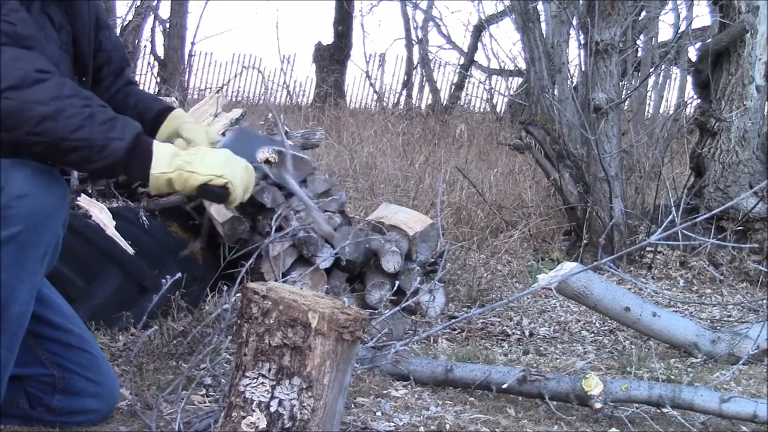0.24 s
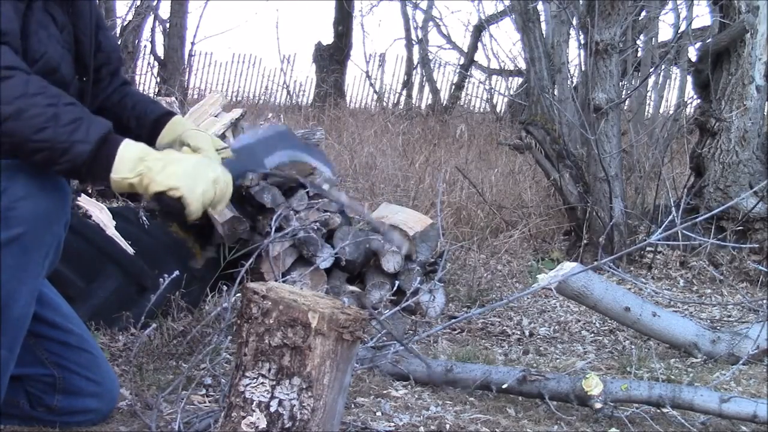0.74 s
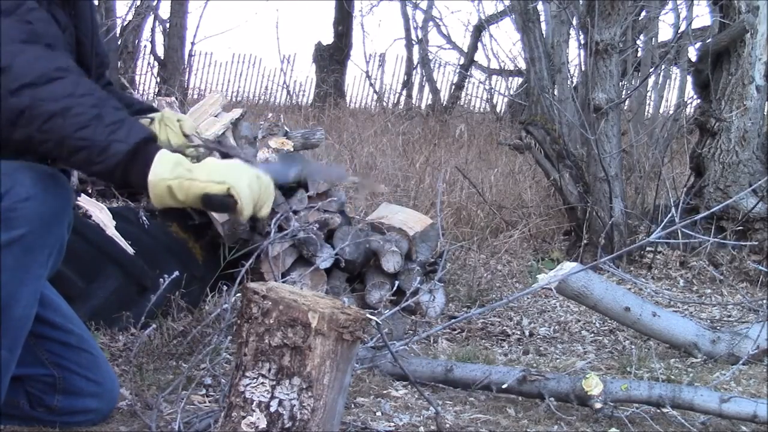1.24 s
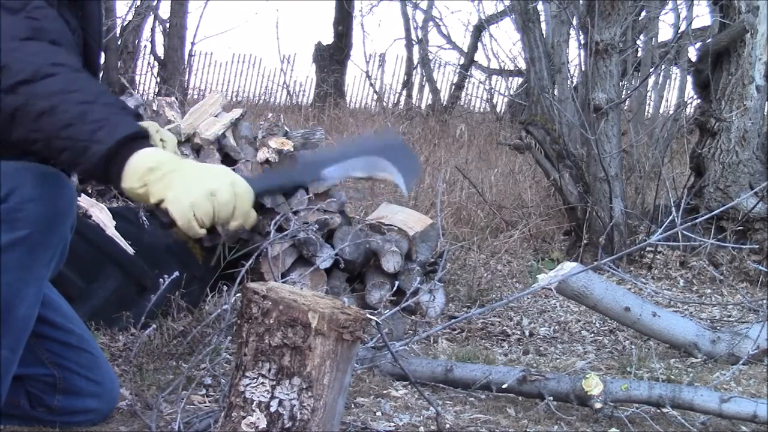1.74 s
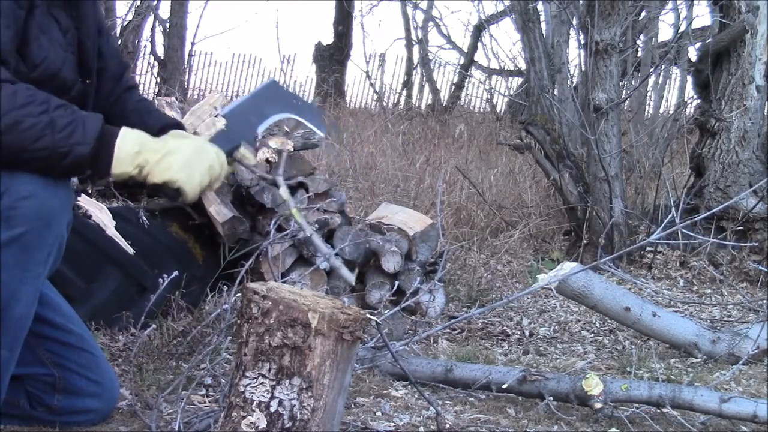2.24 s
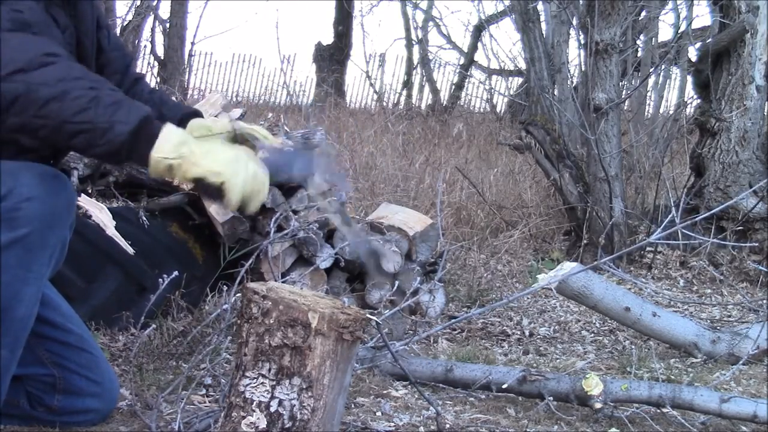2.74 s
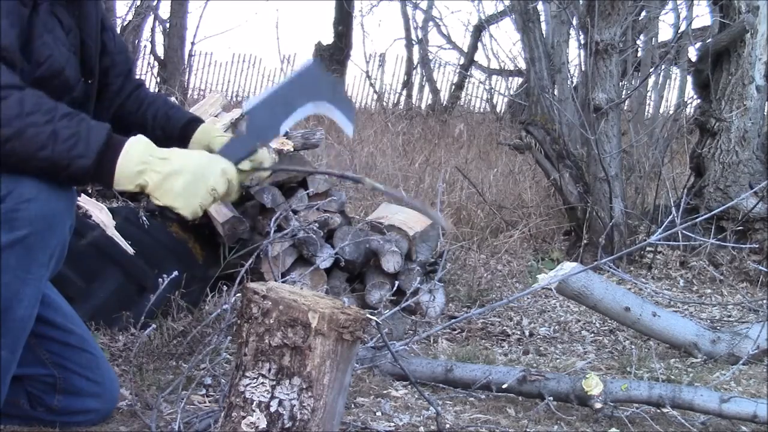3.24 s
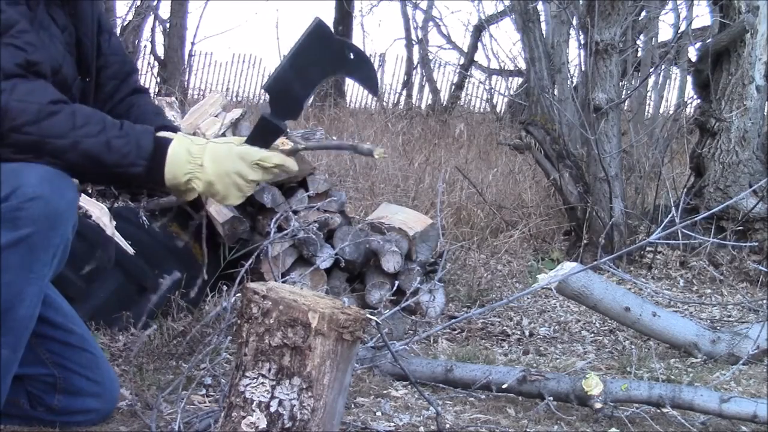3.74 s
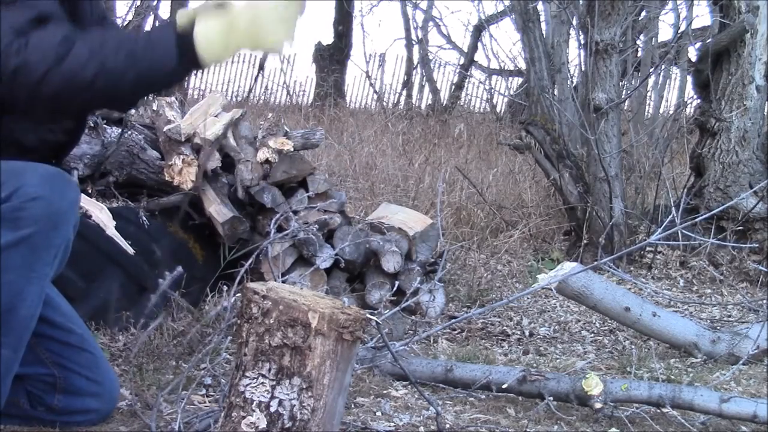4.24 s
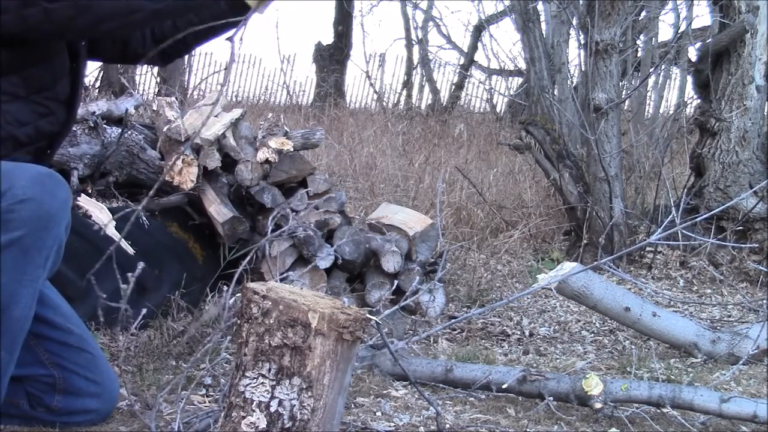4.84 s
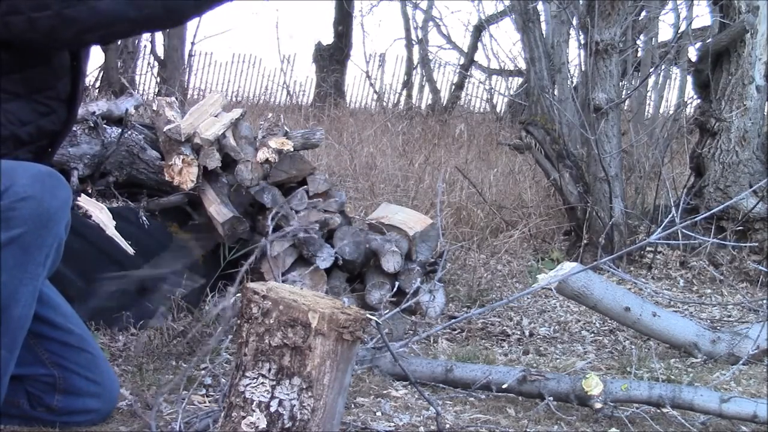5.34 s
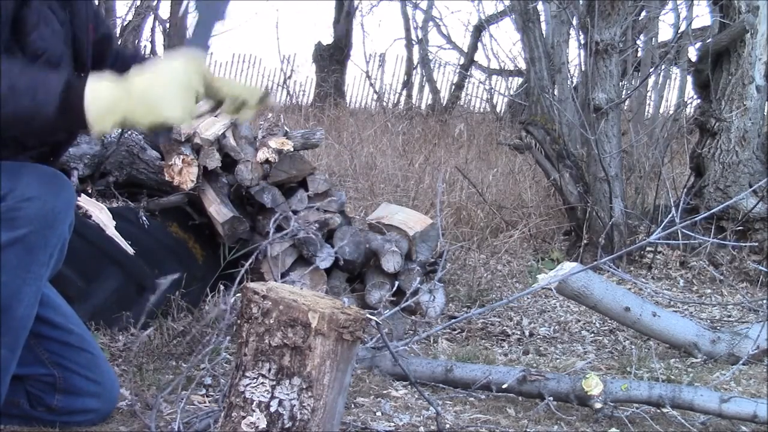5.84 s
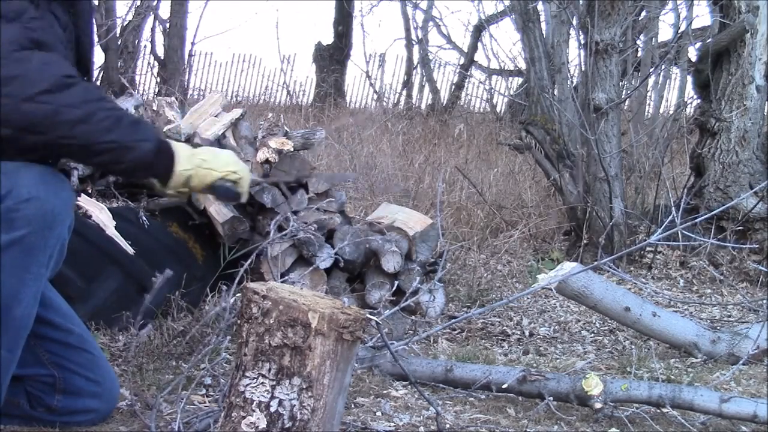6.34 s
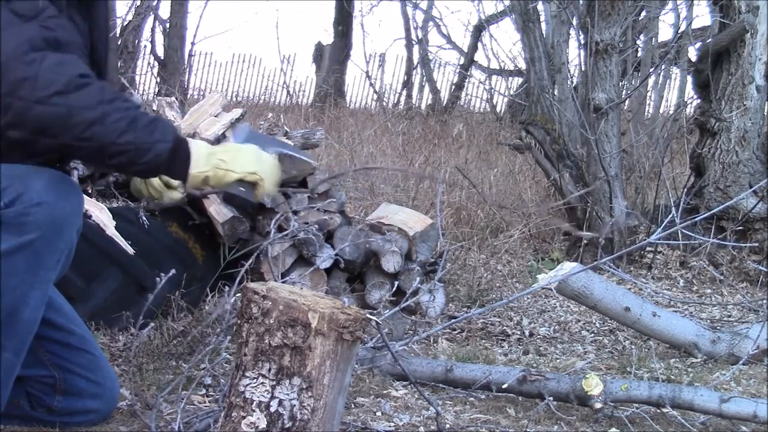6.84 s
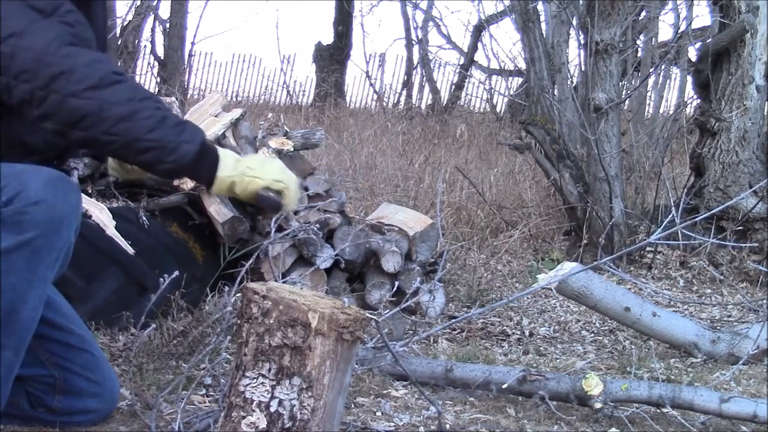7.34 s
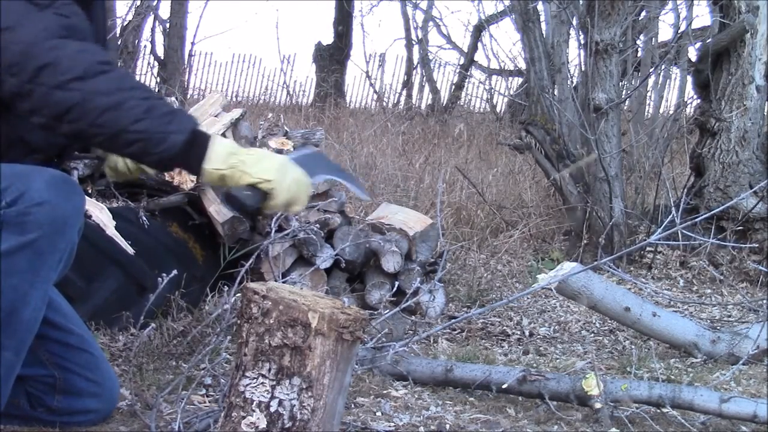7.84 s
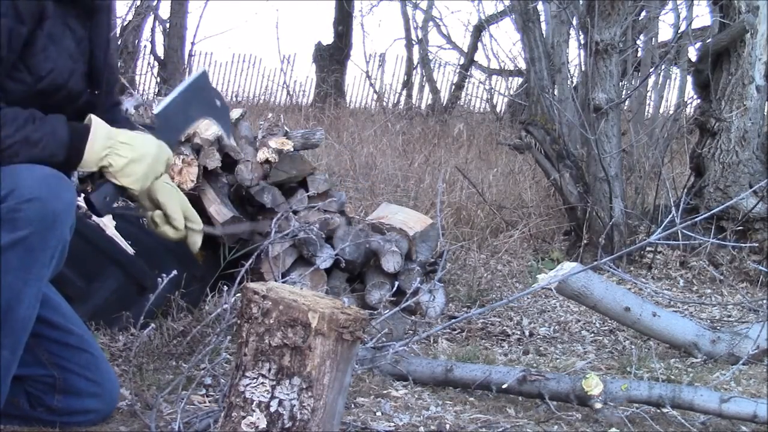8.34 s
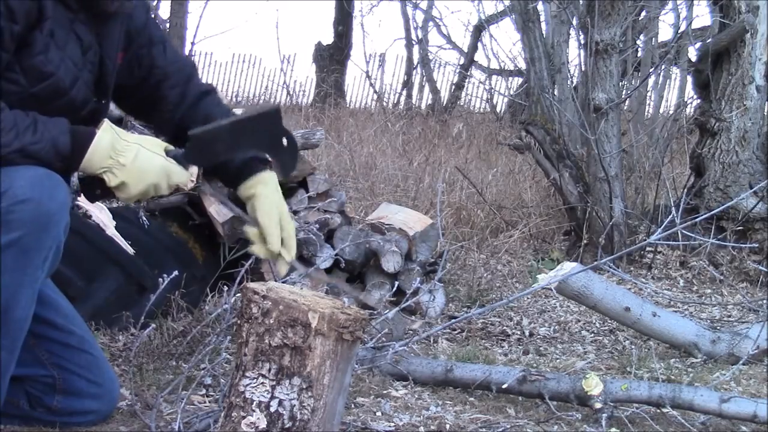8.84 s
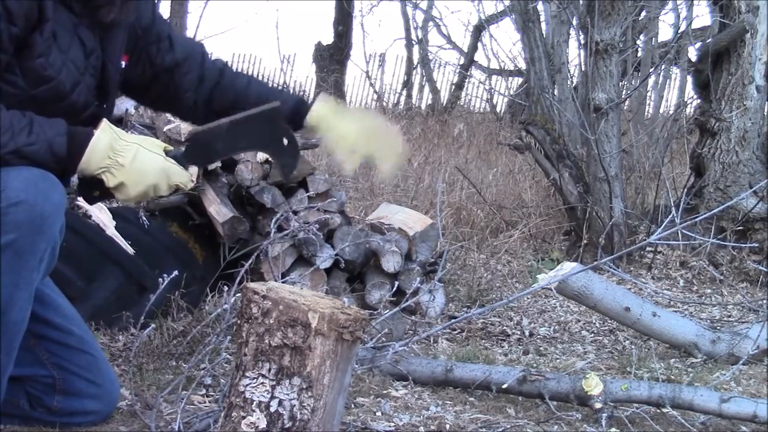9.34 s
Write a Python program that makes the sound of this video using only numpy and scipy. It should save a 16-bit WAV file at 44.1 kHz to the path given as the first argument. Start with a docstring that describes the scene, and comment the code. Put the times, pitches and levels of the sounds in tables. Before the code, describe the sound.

Outdoors, crisp blade chops ring faintly and tear through dry twigs, while sticks knock on logs and gloves rustle in between.

```python
"""Outdoors beside a woodpile, a kneeling person trims thin dry branches with a steel billhook.
The blade bites, rings and tears: filtered cracks, damped modes and swelling showers of fractures.
Twigs snap as short band-limited cracks; cut sticks clatter on the logs with clack, ring and thud.
Gloves, jacket and dry leaves rustle as grain noise over a distant hush of shaped noise."""
import sys
import numpy as np
from scipy import signal
from scipy.fft import rfft, irfft, next_fast_len
from scipy.io import wavfile
from scipy.ndimage import map_coordinates

SR = 44100
rng = np.random.default_rng(int(sys.argv[2]) if len(sys.argv) > 2 else 0)


def unload_wav(signal):
    """Save mono or channel-first audio to the path in sys.argv[1] as 16-bit WAV at rate SR, clipped to [-1, 1]."""
    wavfile.write(
        sys.argv[1],
        SR,
        np.round(np.clip(np.atleast_2d(signal).T, -1, 1) * 32767).astype(np.int16),
    )


N = 423801
T = np.arange(SR // 3) / SR  # time within one hit, s
HZ = np.fft.rfftfreq(len(T), 1 / SR)

# All event levels below are relative: scene() adds a common offset to each layer.
# Chops, each entering, tearing through and breaking out of a branch:
# [start_s, through_s, entry_db, entry_hz, tear_db, exit_db, exit_hz, exit_thud_db, ring_db,
#  place (0 mid-blade, 1 near the hook)]
CHOP_EVENTS = [(.3519, .0224, -19.5, 2970, -26.5, -21, 5000, -49, -25, 0),
               (1.2092, 0.041, -29, 2600, -36, -40.5, 1500, -47, -57, .6),
               (1.6304, 0.0071, -32.5, 4000, -31.5, -31.5, 4500, -47, -39, 0.88),
               (2.7593, 0.017, -26, 2600, -27.5, -31.5, 5600, -38, -31, .3),
               (6.4773, .0512, -28, 3200, -34.5, -29, 2900, -38, -39, 0.6),
               (7.1151, .0161, -31, 3850, -35.5, -25.5, 2390, -40, -38, 1),
               (7.617, 0.0094, -31.5, 1910, -28, -23, 3000, -32.5, -39, 0.4)]
# Natural modes of a cut stick: [mode_hz, level_db, t60_s]
STICK_MODES = [(539, -3, 0.083), (790, -31, 0.021), (1080, 11.5, 0.035), (1500, -24, .04),
               (1875, -8.5, 0.057), (2070, -1.5, 0.052), (2600, 0, 0.034)]


def amp(db):
    """Logarithmic level: decibels to amplitude gain."""
    return 10 ** (np.asarray(db) / 20)


def unit(x):
    """Normalisation of mean power: scale to rms 1."""
    return x / np.sqrt(np.mean(x ** 2) + 1e-20)


def blow(x):
    """Normalisation of impact energy: scale a hit to the energy of 5 ms at rms 1."""
    return x * np.sqrt(.005 * SR / (np.sum(x ** 2) + 1e-20))


def fade(t60):
    """Exponential damping: the amplitude falls by 60 dB in t60 seconds."""
    return np.exp(-np.log(1000) * T / max(t60, 1e-4))


def along(points, hz):
    """Logarithmic frequency scale: interpolate (Hz, value) points on it."""
    f, v = np.transpose(points)
    return np.interp(np.log(hz + 1), np.log(f + 1), v)


def around(hz, span):
    """Proportional bandwidth: limits a factor of span below and above a pitch."""
    return hz / span, hz * span


def add(track, s, x):
    """Superposition: mix x into the track from time s."""
    start = max(round(s * SR), 0)
    track[start:start + len(x)] += x[:max(N - start, 0)]


def band(x, low_hz, high_hz):
    """Causal band-pass: size sets the lowest pitch, sharpness of contact the highest."""
    low = signal.butter(2, np.clip(low_hz, 20, SR / 3), 'high', fs=SR, output='sos')
    high = signal.butter(3, np.clip(high_hz, 200, SR / 2.2), fs=SR, output='sos')
    return signal.sosfilt(np.vstack([low, high]), x)


def colour(x, points):
    """Spectral shaping: weight a long noise by frequency."""
    m = next_fast_len(N + SR // 4)
    gain = amp(along(points, np.fft.rfftfreq(m, 1 / SR)))
    return irfft(rfft(x, m) * gain, m)[:N]


def wobble(rate, size=N):
    """Slow random fluctuation: a smooth curve through rate random knots a second."""
    knots = rng.standard_normal(int(size * rate / SR) + 4)
    return map_coordinates(knots, [np.arange(size) * rate / SR])


def fibres(rate, spread_db, size):
    """Random impulse process: rate tiny fractures a second, of uneven strength, at rms 1."""
    present = rng.random(size) < rate / SR
    strength = amp(spread_db * np.clip(rng.standard_normal(size), -2, 2))
    sign = np.sign(rng.standard_normal(size))
    return unit(present * strength * sign)


def crack(t60, splinter):
    """Brittle fracture: one sharp impulse, then a dying shower of splinters."""
    shower = blow(fibres(rate=14000, spread_db=2, size=len(T)) * fade(t60))
    impulse = blow(1. * (T == 0))
    return impulse + splinter * shower


def ring(hz, db, t60):
    """Modal superposition: damped sines, at slightly new strengths for each blow."""
    levels = db + rng.standard_normal(len(hz))
    return sum(amp(g) * np.sin(2 * np.pi * f * T) * fade(d) for f, g, d in zip(hz, levels, t60))


def stroke(rise, fall, low_hz, high_hz, rate, spread_db, clump_db):
    """Granular friction: grains swell to a crest, two rise times after the start, and die away."""
    t = np.arange(-2 * rise, 2 * fall, 1 / SR)
    swell = np.exp(-2 * (t / np.where(t < 0, rise, fall)) ** 2)
    # the stroke catches and slips, so the grains come in clumps
    clumps = amp(clump_db * np.clip(wobble(rate=160, size=2 * SR), -2, 2))
    grains = band(clumps * fibres(rate, spread_db, size=2 * SR), low_hz, high_hz)[:len(t)]
    return unit(swell * grains) * np.sqrt(np.mean(swell ** 2))


def thud(hz, t60, rattle):
    """Low-frequency impact: a heavy piece of wood makes one damped swing and a dull rattle."""
    swing = blow(np.sin(2 * np.pi * hz * T) * fade(t60))
    dull = blow(band(crack(t60, splinter=3.6), hz / 2, hz * 2))
    return blow(band(swing + rattle * dull, hz * 0.66, hz * 4))


def background(level_db):
    """Incoherent summation: far wind and roads merge into a soft, slowly wavering hush."""
    # Spectrum of the distant hush: [frequency_hz, relative density_db per Hz]
    air_spectrum = [(12, -48), (20, -16.5), (65, -18.5), (86, -10), (228, -3), (422, -2), (459, -2),
                    (513, -2.5), (759, -3.5), (873, -4), (976, -6), (1370, -6), (3630, -13), (5680, -19),
                    (16000, -33)]
    hush = unit(colour(rng.standard_normal(N), air_spectrum))
    return amp(level_db + 0.25 * wobble(2.02)) * hush


def woods(x):
    """Diffuse scattering: ground, logs and trunks send back a short, faint tail."""
    # Decay of the scattered sound: [frequency_hz, t60_s]
    scatter_decay = [(150, 0.29), (1000, 0.22), (4000, 0.19), (14000, 0.2)]
    hz, t, z = signal.stft(rng.standard_normal(SR // 2), SR, nperseg=256)
    decay = np.exp(-np.log(1000) * t / along(scatter_decay, hz)[:, None])
    tail = signal.istft(z * decay, SR, nperseg=256)[1]
    tail = np.pad(tail / np.linalg.norm(tail), (SR // 220, 0))  # begins after about 4.5 ms
    return signal.fftconvolve(x, tail)[:N]


def leaf_litter(level_db):
    """Random micro-fracture: dry litter underfoot crackles as it is stirred."""
    # Course of the stirring: [time_s, level_db]
    stir_course = [(0.0, -58.5), (2.81, -72.5), (3.32, -59), (4.68, -69.5), (7.39, -59), (9.21, -72.5),
                   (9.61, -55.5)]
    # Spectrum of the crackle: [frequency_hz, relative density_db per Hz]
    litter_spectrum = [(200, -11), (900, 12), (3000, -1), (8000, 0.5), (12000, -10.5), (16000, -49)]
    stir_db = np.interp(np.arange(N) / SR, *np.transpose(stir_course))
    crackle = unit(colour(fibres(rate=3000, spread_db=8, size=N), litter_spectrum))
    return amp(stir_db + level_db + 4.8 * wobble(25)) * crackle


def brushes(brush_db, rub_db):
    """Friction and resonance: gloves and sleeves brush twigs and leaves, and the wood answers."""
    # Brushing strokes: [crest_s, swell_s, level_db, pitch_hz]
    brush_events = [(1.172, 0.016, -50, 3300), (3.55, 0.22, -57, 1500), (3.975, 0.098, -54, 950),
                    (5.124, 0.026, -58.5, 5500), (5.27, .09, -63, 1500), (5.382, 0.018, -53.5, 2700),
                    (5.67, .08, -64, 2600), (5.94, 0.073, -53.5, 4200), (6.658, 0.016, -56, 3580),
                    (7.431, .023, -53, 1500), (7.74, .11, -60.5, 4870), (8.12, .085, -59, 4900),
                    (8.305, 0.065, -52.5, 3450), (9.07, 0.045, -61, 3900), (9.588, .03, -59, 4730)]
    out = np.zeros(N)
    for s, swell, db, hz in brush_events:
        low_hz, high_hz = around(hz, span=2.13)
        grains = stroke(swell, swell, low_hz, high_hz, rate=4400, spread_db=6, clump_db=2.5)
        brush = amp(db + brush_db) * grains
        stick = ring(*np.transpose(STICK_MODES)) * fade(t60=.025)  # the glove damps the stick
        answer = signal.fftconvolve(brush, stick / np.linalg.norm(stick))
        add(out, s - 2 * swell, brush)
        add(out, s - 2 * swell, amp(rub_db) * answer)
    return out


def snaps(snap_db, quiver_db):
    """Brittle failure: a dry twig breaks in one click and quivers for a moment."""
    # Breaking twigs and fibres: [start_s, level_db, lowest_hz]
    snap_events = [(.455, -53, 1080), (0.4894, -47, 1140), (.7024, -42, 3300), (1.4143, -45, 2600),
                   (2.0145, -34.5, 2190), (2.019, -37.5, 2600), (2.7954, -41, 730), (3.0385, -38, 3620),
                   (3.1903, -40.5, 3300), (4.2909, -53.5, 1080), (4.5568, -54, 1610), (6.5192, -36, 2160),
                   (6.5415, -36, 1640), (6.5927, -45.5, 1910), (6.598, -45.5, 1300), (6.9355, -43.5, 2680),
                   (7.1637, -28, 3500), (7.208, -50, 3500), (7.326, -44, 1840), (7.3639, -43, 1610),
                   (7.512, -43, 1800), (7.5422, -39.5, 1300), (7.5475, -37, 1390), (7.6272, -33, 5000),
                   (8.068, -50, 1410), (9.091, -51, 1100)]
    out = np.zeros(N)
    for s, db, low_hz in snap_events:
        high_hz = 6800 + .8 * low_hz
        t60 = 48 / low_hz  # decay in cycles of the lowest pitch: thin twigs are high and short
        click = blow(band(crack(t60, splinter=1.0), low_hz, high_hz))
        quiver = blow(band(crack(t60=0.044, splinter=11.0), low_hz * 0.083, high_hz))
        add(out, s, amp(db + snap_db) * click)
        add(out, s, amp(db + quiver_db) * quiver)
    return out


def knocks(clack_db, stick_db, pile_db, detune):
    """Impact excitation: each stick clacks, rings at its own pitch and thumps what it lands on."""
    # Sticks knocking on the pile, the blade and each other:
    # [start_s, level_db, pitch_hz, thud_db, thud_hz]
    knock_events = [(0.3404, -34, 1100, -54, 605), (0.4272, -29, 1980, -33.5, 528),
                    (.432, -23, 2650, -43, 545), (0.6269, -37, 1270, -42, 576),
                    (.7316, -23.5, 1650, -26, 494), (.756, -48, 1000, -46, 500),
                    (.8177, -60, 850, -41, 530), (.837, -42.5, 840, -43, 564), (.877, -62, 850, -45, 518),
                    (1.5668, -34, 1410, -45, 640), (2.8262, -40, 1450, -65, 530),
                    (3.0253, -57, 2000, -41.5, 374), (3.066, -49, 1200, -54, 400),
                    (3.843, -42, 1710, -49, 326), (3.9063, -41.5, 1280, -58, 350),
                    (3.947, -47, 1100, -57, 330), (3.9792, -49.5, 1020, -48, 330),
                    (4.3578, -32, 2430, -41.5, 516), (4.4101, -44.5, 2340, -65, 530),
                    (5.4436, -39, 1550, -37.5, 543), (5.452, -21.5, 1620, -30, 543),
                    (5.4644, -36, 1410, -38, 505), (6.4252, -36.5, 1380, -65, 530),
                    (6.4594, -39, 1300, -62, 530), (7.136, -40, 1450, -36, 266),
                    (7.3391, -41, 1650, -68, 530), (7.637, -35, 2520, -42.5, 215),
                    (7.753, -46, 2120, -40, 303), (7.686, -48, 2400, -66, 530),
                    (7.766, -44.5, 1500, -60, 300), (7.912, -54.5, 2600, -70, 530),
                    (7.948, -53, 2880, -70, 530), (8.2941, -46, 2280, -50.5, 530),
                    (8.3386, -43, 1520, -66, 534), (9.445, -47, 2230, -46, 283),
                    (9.475, -46, 2020, -50, 402), (9.551, -49, 1550, -42, 290)]
    out = np.zeros(N)
    hz, mode_db, mode_t60 = np.transpose(STICK_MODES)
    for s, db, pitch_hz, low_db, thud_hz in knock_events:
        low_hz, high_hz = around(pitch_hz, span=1.43)
        # 51 cycles of decay at a level of -40 dB; 26 dB harder is twice as crisp
        t60 = 51 / pitch_hz * .5 ** ((db + 40) / 26)
        contact = crack(t60, splinter=1.07)
        # blunt wood on wood, with a faint tick of bark on top
        clack = blow(band(contact, low_hz, high_hz)) + amp(-16) * blow(band(contact, high_hz, 7000))
        wood = ring(hz * (1 + detune * rng.standard_normal()), mode_db, mode_t60)
        add(out, s, amp(db + clack_db) * clack)
        add(out, s, amp(db + stick_db) * blow(band(wood, low_hz / 2, high_hz)))
        add(out, s, amp(low_db + pile_db) * thud(thud_hz, t60=0.062, rattle=0.45))
    return out


def blade(place):
    """Modal participation: the place of contact decides which steel modes speak."""
    # Free blade modes: [mode_hz, mid_blade_db, near_hook_db, t60_s]
    steel_modes = [(1622, -24, -20, .12), (2556, 0, -11, .14), (4075, -29, 0, .12), (5650, -26, -13, .06),
                   (6124, -28, -14, .07), (7580, -17, -12, .07), (8366, -24, -22, .08),
                   (10341, -18, -19, .1), (10938, -23, -20, .15)]
    hz, middle_db, hook_db, t60 = np.transpose(steel_modes)
    return ring(hz, middle_db + np.clip(place, 0, 1) * (hook_db - middle_db), t60)


def in_hand(x):
    """Damped resonance: hand and wood broaden the blade's resonances; the energy is kept."""
    # Resonances of the gripped blade: [centre_hz, width_hz, gain_db]
    grip_resonances = [(814, 380, 22.5), (1600, 560, 9.5), (2700, 520, 13), (3900, 540, 9),
                       (5600, 670, 8.5), (6215, 310, 8), (7440, 610, 12), (8300, 730, 4.5),
                       (9870, 1340, 6.5), (12360, 3400, 12.5)]
    gain = .5 + sum(amp(db) / (1 + (2 * (HZ - hz) / width) ** 2)
                    for hz, width, db in grip_resonances)
    # folding the cepstrum makes the response causal
    cepstrum = irfft(np.log(gain), len(T))
    cepstrum[1:] *= 2
    cepstrum[len(T) // 2:] = 0
    heard = signal.fftconvolve(x, irfft(np.exp(rfft(cepstrum))))
    return heard * np.linalg.norm(x) / np.linalg.norm(heard)


def slides():
    """Sliding contact: the edge travels through the branch in a chop, or sings along the bark."""
    # Scrapes along the bark:
    # [crest_s, swell_s, level_db, pitch_hz, singing_db, place (0 mid-blade, 1 near the hook)]
    scrape_events = [(.028, .016, -42.5, 2700, -55, .8), (.315, .024, -37.5, 3500, -41, .9),
                     (.39, .018, -37.5, 4400, -41, .2), (.648, 0.023, -47, 1600, -55, .9),
                     (.719, .008, -46, 4200, -66, .6), (1.49, .012, -52, 3500, -54, 1),
                     (2.845, 0.051, -51, 1550, -62, .3), (6.538, .042, -35.5, 3500, -43, .85),
                     (6.775, .03, -57, 2400, -58, .55), (7.62, .055, -46, 2330, -48, 0.73)]
    for s, through, _, _, db, _, _, _, _, place in CHOP_EVENTS:
        crest_s = s + .6 * through
        rise = .55 * through
        fall = 0.43 * through + 0.011  # the last fibres hold on a little longer
        yield crest_s, rise, fall, db, *around(3500, span=2.58), db - 12.5, place
    for s, swell, db, hz, sing_db, place in scrape_events:
        yield s, swell, swell, db, *around(hz, span=2.3), sing_db, place


def cuts(tear_db, steel_db):
    """Forced vibration: fibres part one after another and keep the blade singing."""
    out = np.zeros(N)
    for s, rise, fall, db, low_hz, high_hz, sing_db, place in slides():
        tear = in_hand(stroke(rise, fall, low_hz, high_hz, rate=3600, spread_db=4.5, clump_db=3))
        steel = signal.fftconvolve(tear, blade(place))
        steel *= np.linalg.norm(tear) / np.linalg.norm(steel)
        add(out, s - 2 * rise, amp(db + tear_db) * tear)
        add(out, s - 2 * rise, amp(sing_db + steel_db) * steel)
    return out


def contacts():
    """Impulsive contact: a chop cracks twice, going in and out; a tap without cutting, once."""
    # Taps on a twig: [start_s, level_db, ring_db, place (0 mid-blade, 1 near the hook)]
    tap_events = [(0.0117, -40, -57, .6), (.053, -41.5, -61, .9), (.1606, -46, -56, 1),
                  (0.179, -44.5, -55, .95), (.249, -46, -53, 1), (.295, -40, -49, 1),
                  (0.6244, -38.5, -55, .9), (1.4716, -48, -53, 0.9), (1.538, -41, -52, 1),
                  (1.609, -43, -35.5, .85), (2.3212, -46, -47.5, 0), (2.417, -54, -53, .05),
                  (2.656, -55, -58, 1), (6.5019, -33.5, -49, .8), (6.6989, -36.5, -52, 0.97),
                  (6.7276, -44.5, -52, 1), (6.797, -50, -60, .6), (7.0716, -30, -42, 1),
                  (7.1239, -30, -42, .7), (7.636, -36, -46, .6)]
    bite_span, bite_t60_s, exit_t60_s = 1.92, 0.021, 0.01  # breaking out is crisper than biting in
    entry_thud_db = -39.5  # every entry jolts the branch equally
    for s, through, entry_db, entry_hz, _, exit_db, exit_hz, exit_thud_db, ring_db, place in CHOP_EVENTS:
        yield s, entry_db, *around(entry_hz, bite_span), bite_t60_s, entry_thud_db, ring_db, place
        # breaking out rings the steel a little less
        out_s, out_ring_db = s + through, ring_db - 1.5
        yield out_s, exit_db, *around(exit_hz, bite_span), exit_t60_s, exit_thud_db, out_ring_db, place
    for s, db, ring_db, place in tap_events:
        yield s, db, *around(2650, span=1.57), 0.048, db - 18.5, ring_db, place


def chops(bite_db, thud_db, steel_db):
    """Impact excitation: the edge cracks into the wood, jolts the branch and rings the steel."""
    out = np.zeros(N)
    for s, db, low_hz, high_hz, t60, low_db, ring_db, place in contacts():
        bite = blow(in_hand(band(crack(t60, splinter=4.7), low_hz, high_hz)))
        add(out, s, amp(db + bite_db) * bite)
        add(out, s, amp(low_db + thud_db) * thud(hz=310, t60=0.048, rattle=3.6))
        add(out, s, amp(ring_db + steel_db) * blade(place))
    return out


def scene():
    """Superposition: all the work close by, its scattered tail and the background."""
    work = leaf_litter(level_db=-3.0) + brushes(brush_db=-1.0, rub_db=-9.5)
    work += snaps(snap_db=-2.5, quiver_db=-5.5)
    work += knocks(clack_db=0.0, stick_db=-8, pile_db=-2, detune=.008)
    work += cuts(tear_db=-2, steel_db=-2)
    work += chops(bite_db=-0.5, thud_db=-4.0, steel_db=-1.5)
    return (background(level_db=-58.63) + amp(-17.0) * woods(work) + work)[None]


def record(dry):
    """Band limitation: the camera keeps only components below 15.9 kHz."""
    m = next_fast_len(N + SR // 4)
    kept = np.fft.rfftfreq(m, 1 / SR) < 15900
    return irfft(rfft(dry, m) * kept, m)[..., :N]


dry = scene()
out = record(dry)
unload_wav(out)
```